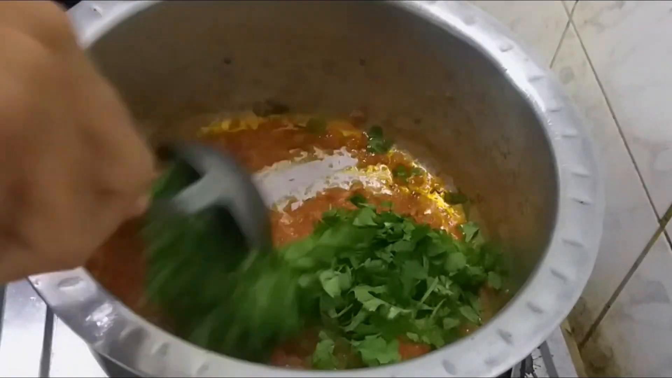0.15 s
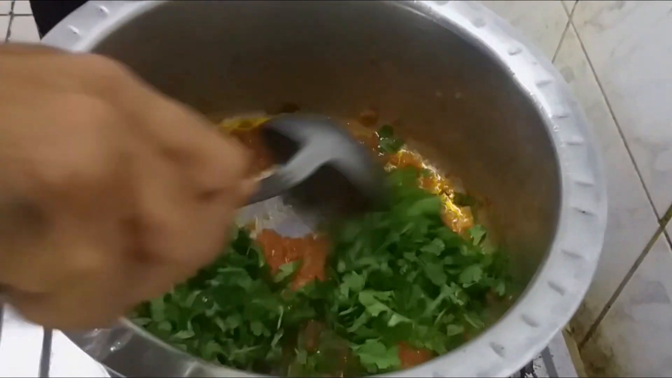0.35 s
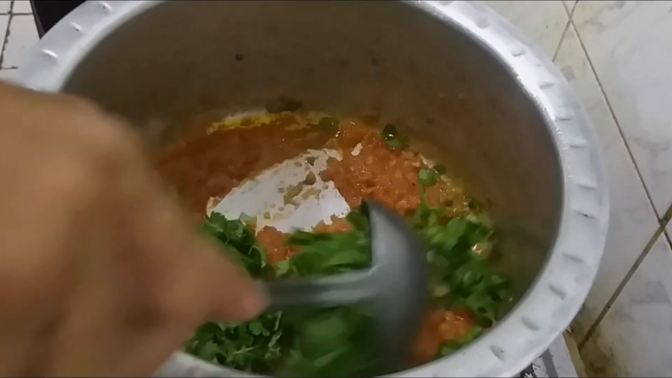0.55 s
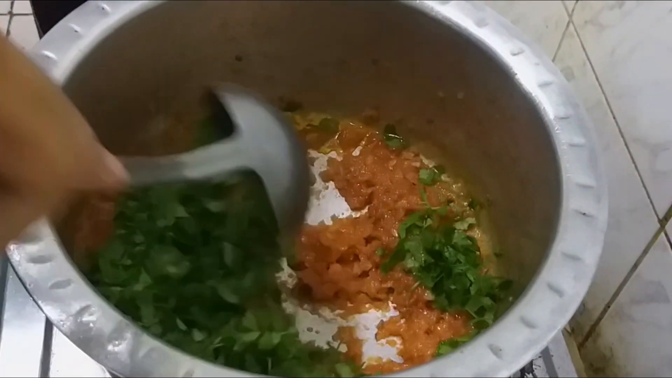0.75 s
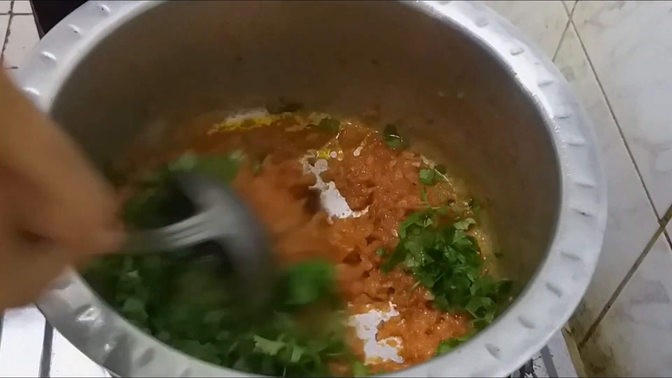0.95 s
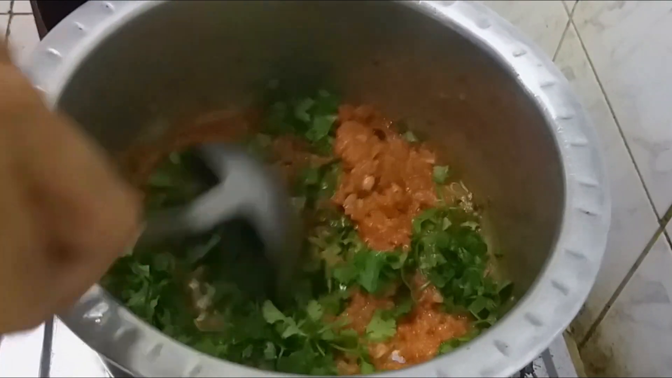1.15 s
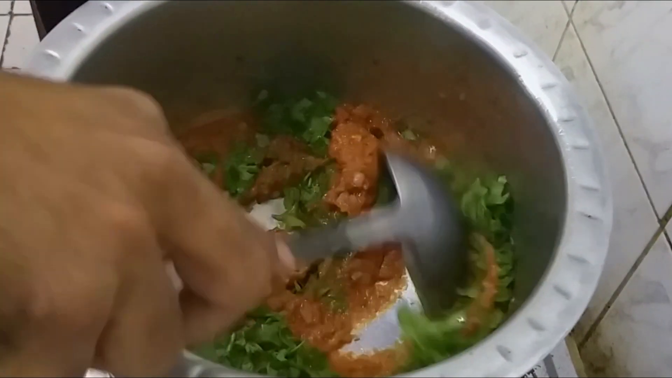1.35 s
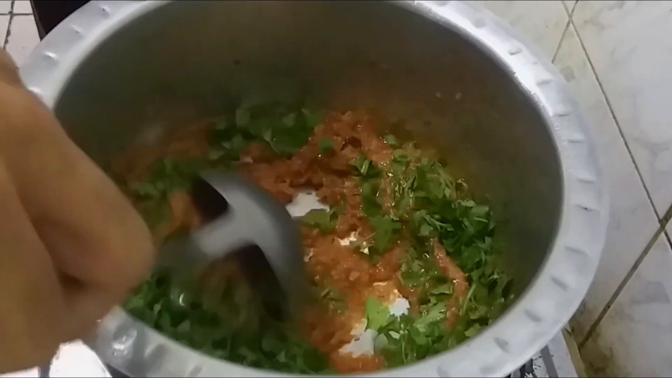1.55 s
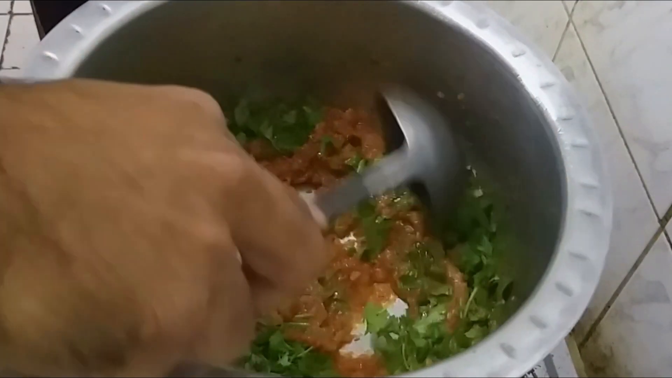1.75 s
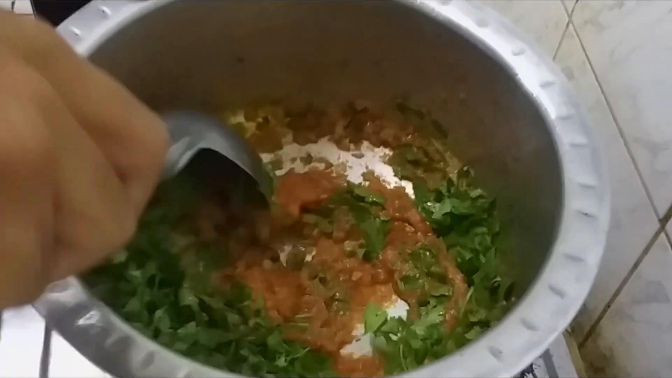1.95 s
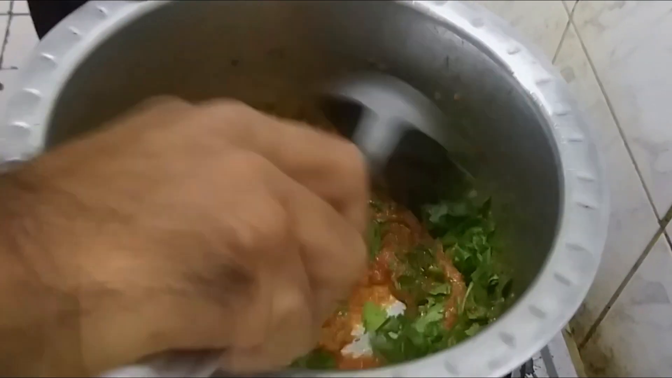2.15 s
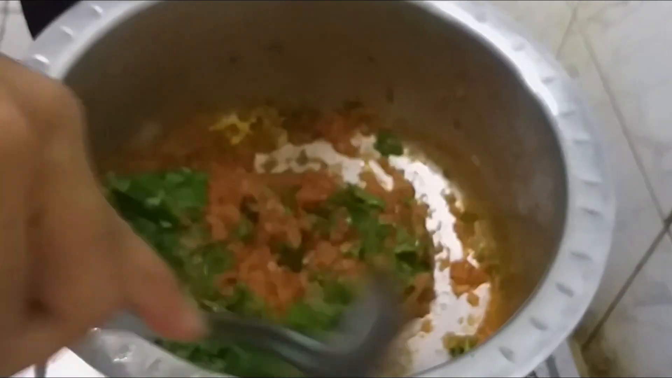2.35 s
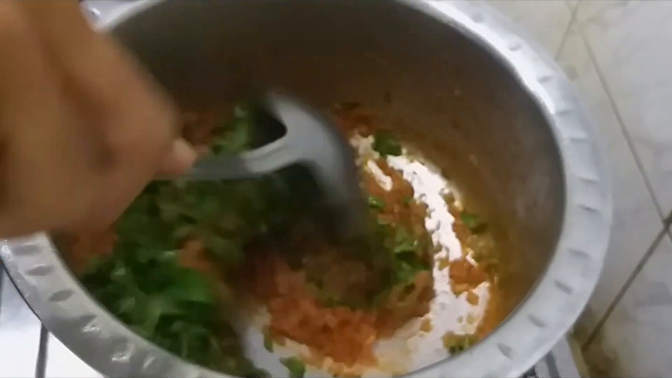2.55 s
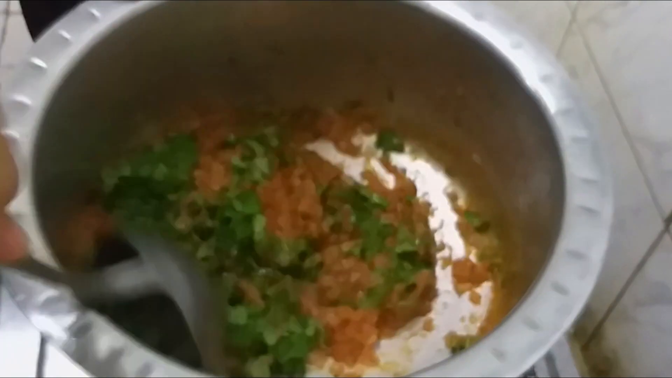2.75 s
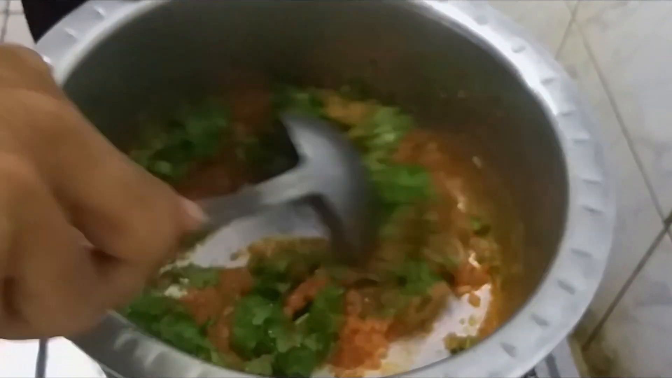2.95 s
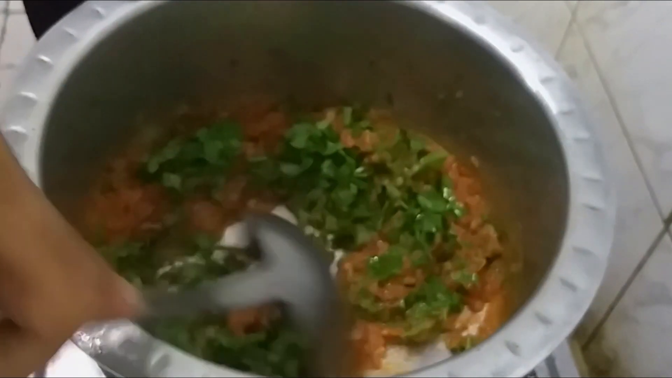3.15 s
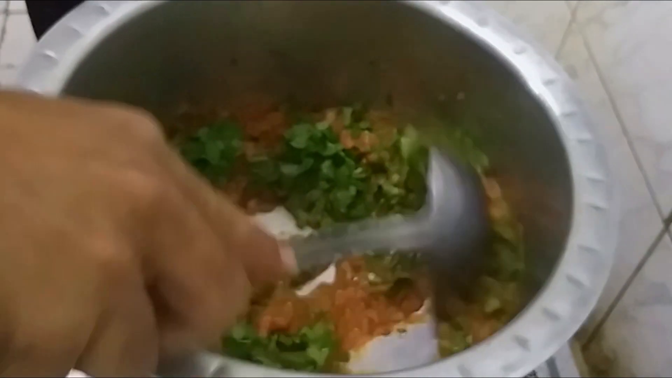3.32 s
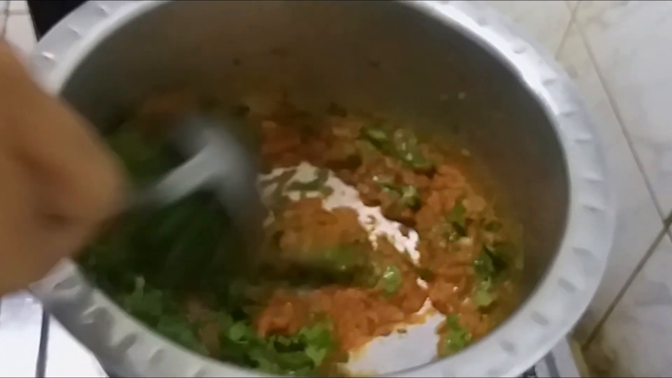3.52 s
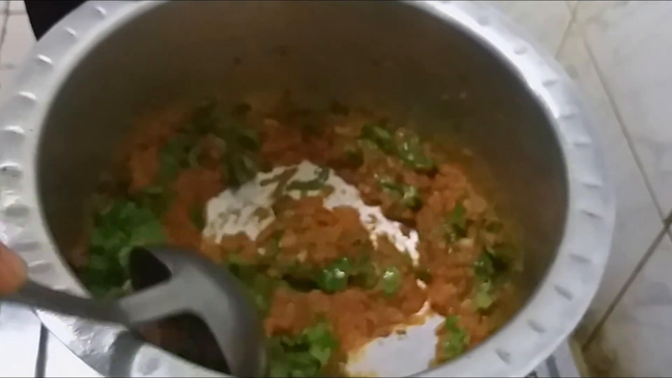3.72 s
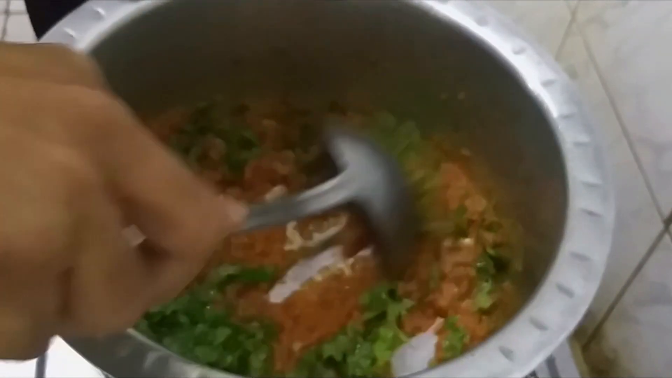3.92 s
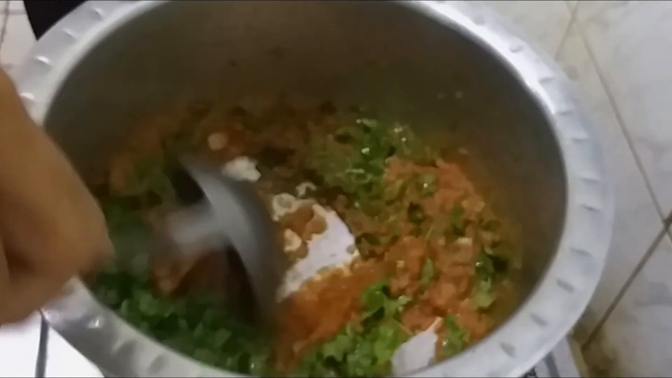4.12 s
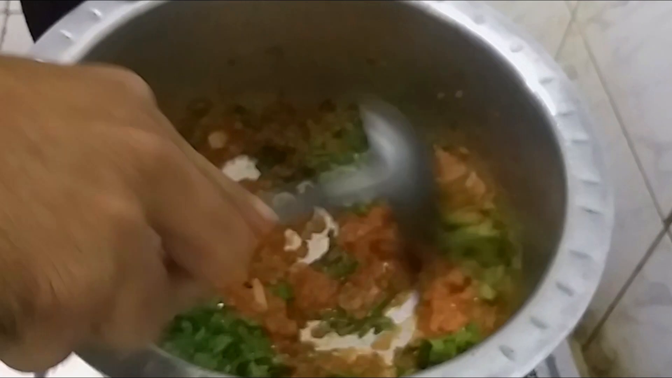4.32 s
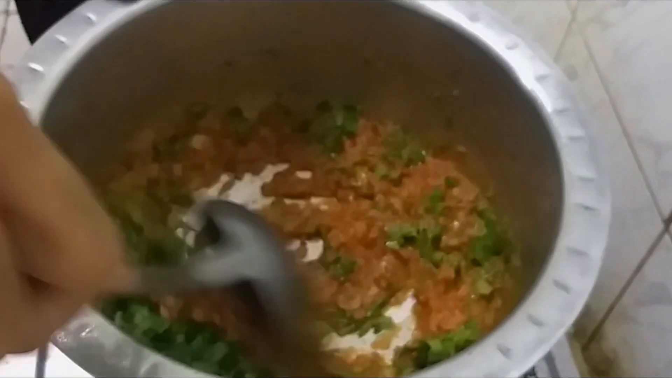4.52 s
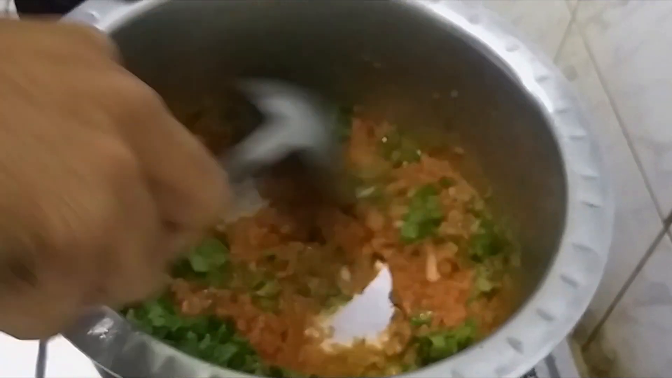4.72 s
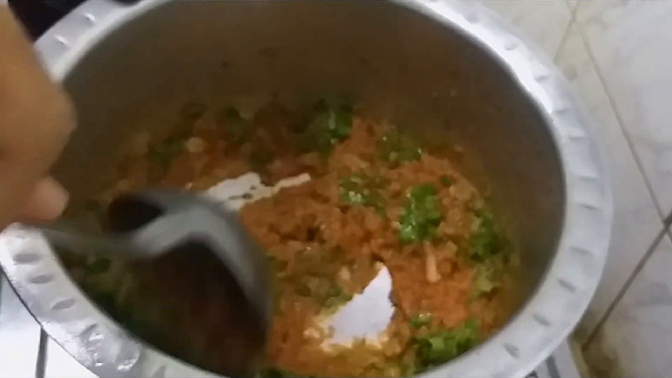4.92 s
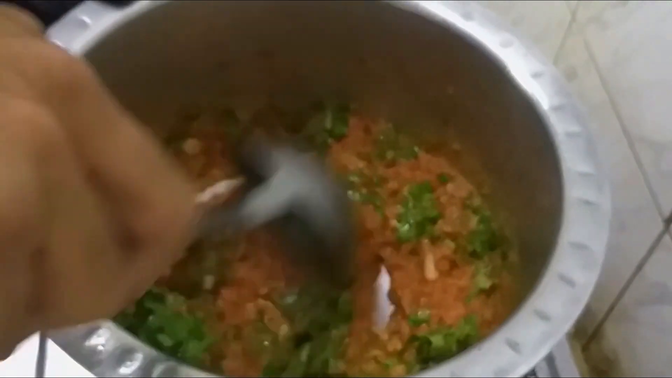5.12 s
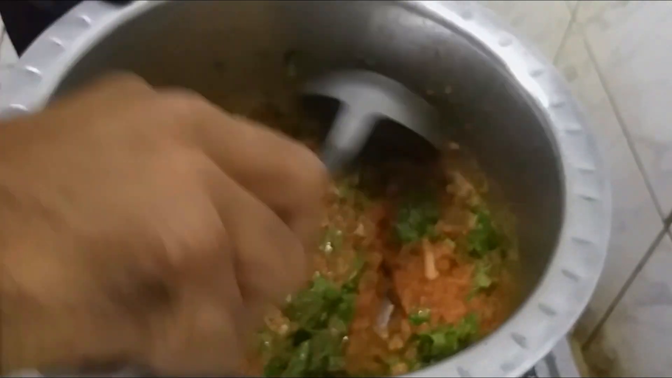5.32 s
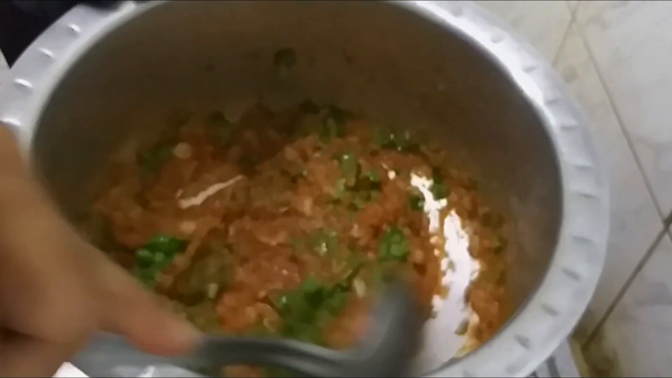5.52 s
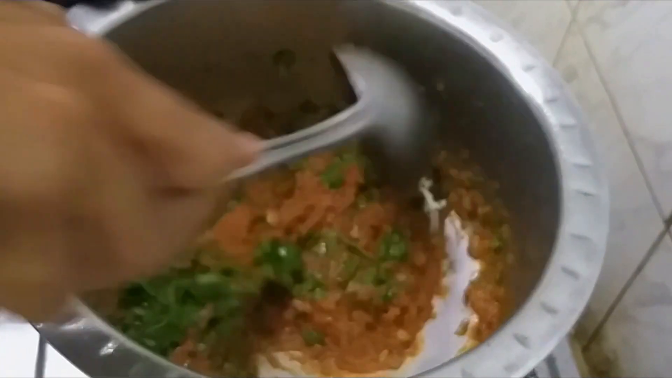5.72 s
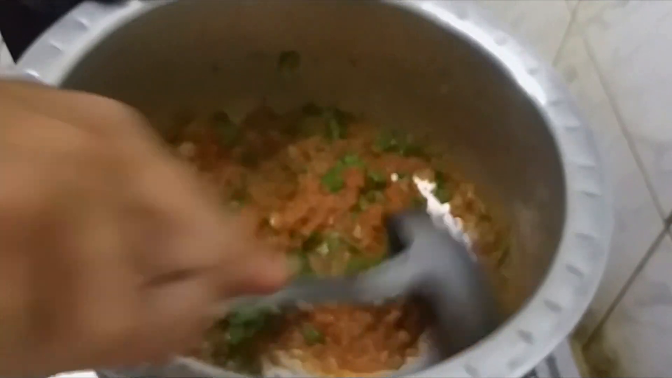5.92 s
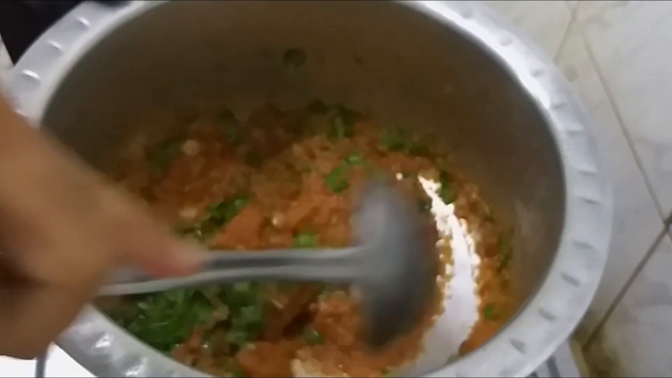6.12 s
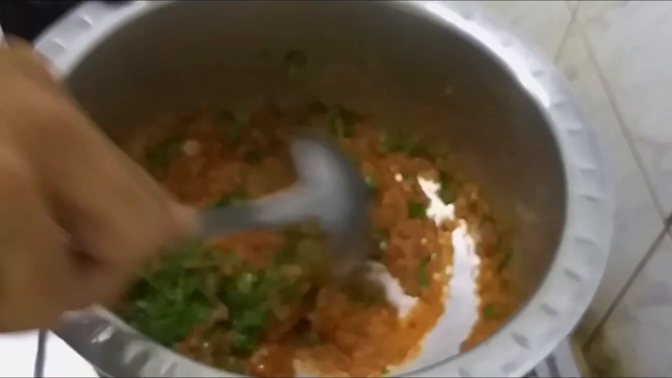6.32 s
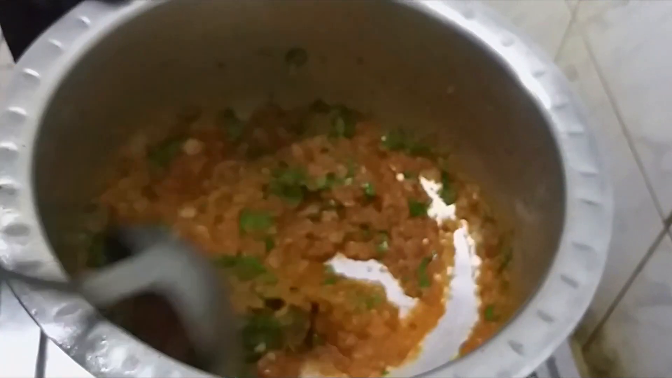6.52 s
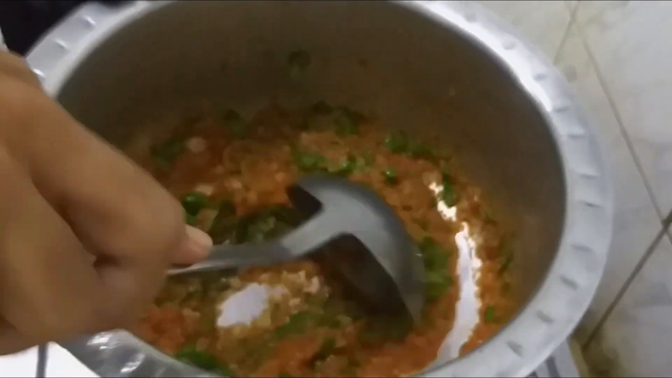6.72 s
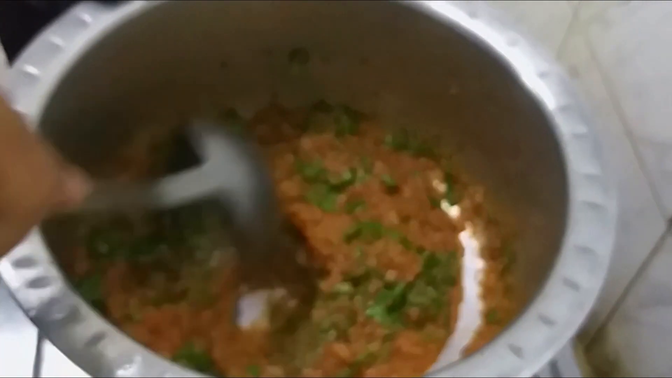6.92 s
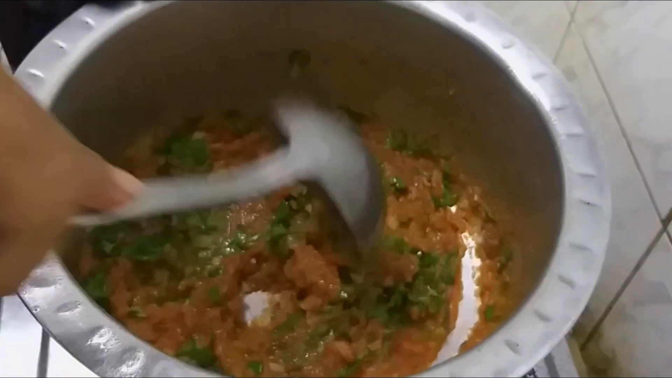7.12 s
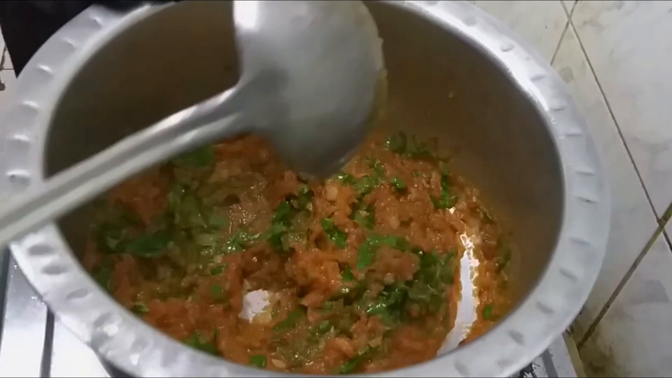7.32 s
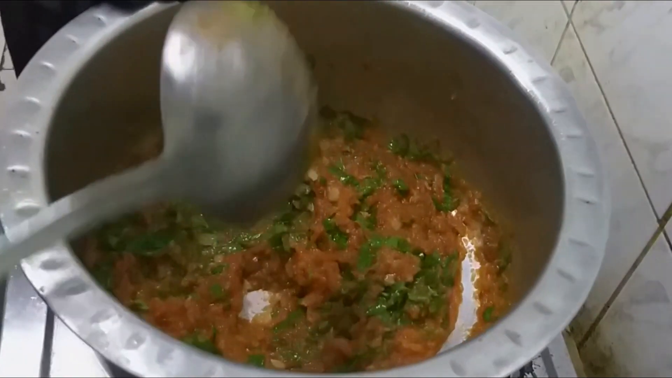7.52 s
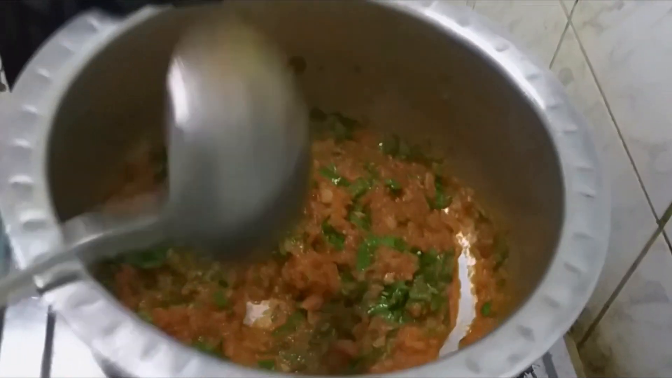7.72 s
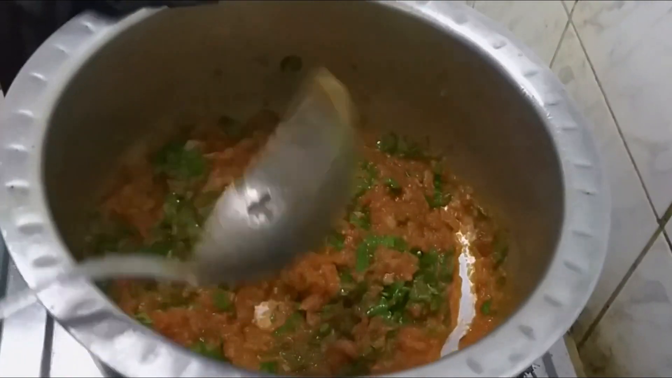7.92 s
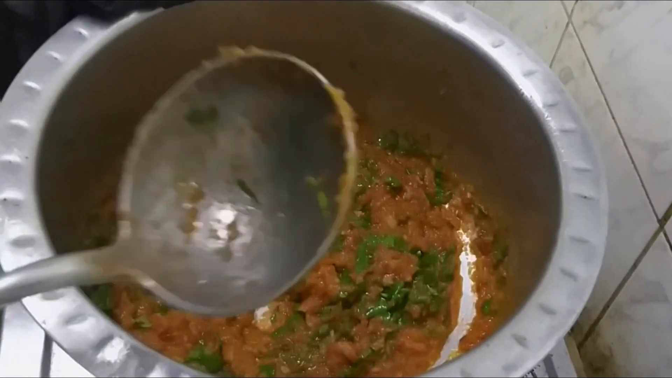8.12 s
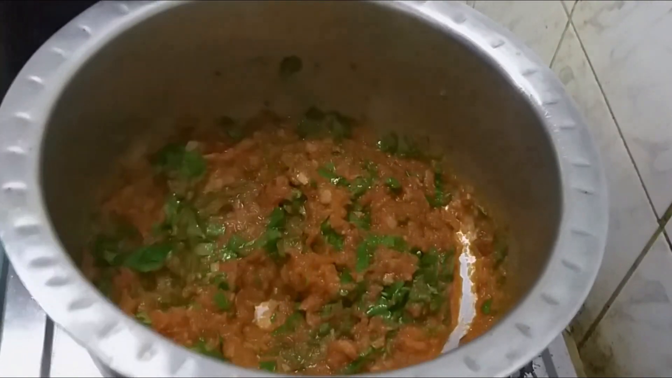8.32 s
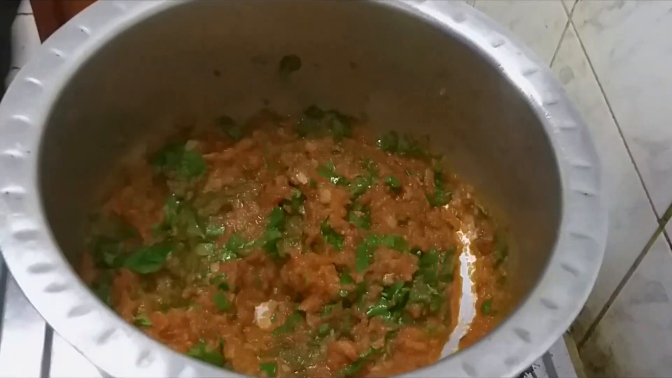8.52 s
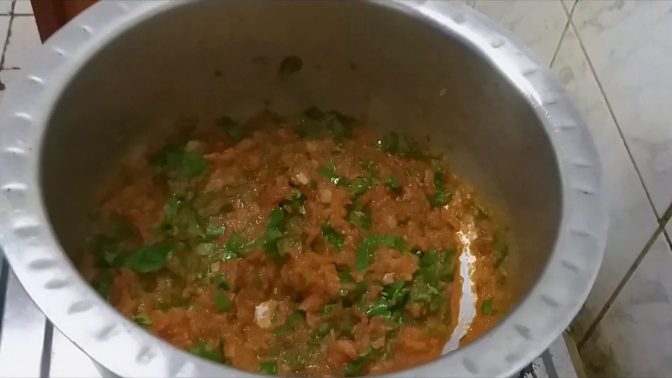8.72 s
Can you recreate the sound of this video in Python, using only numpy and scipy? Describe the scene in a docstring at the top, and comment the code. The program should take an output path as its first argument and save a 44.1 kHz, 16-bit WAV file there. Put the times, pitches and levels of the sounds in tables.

```python
"""A wet metallic scrape opens: a steel ladle stirs thick gravy and herbs in a wide aluminium pot, close by.
The edge slips and catches on the bottom, and the drag hums in the hollow pot; knocks on the damped metal
thud, and the free rim clangs in its wall modes, with two taps near the end. Bubbles fry faintly.
A far engine outside, three pure tones, revs once and is gone after the first second or so.
The tiled kitchen adds a diffuse tail; the microphone rolls off the bass and rounds the highest peaks."""
import sys
import numpy as np
from scipy import signal
from scipy.fft import rfft, irfft
from scipy.io import wavfile
from scipy.ndimage import uniform_filter1d

SR = 44100
rng = np.random.default_rng(int(sys.argv[2]) if len(sys.argv) > 2 else 0)


def dump(signal):
    """Clip the signal to [-1, 1] and save it as 16-bit WAV at the path in sys.argv[1]."""
    limited = np.clip(np.atleast_2d(signal).T, -1, 1)
    pcm = np.round(limited * 32767).astype(np.int16)
    wavfile.write(sys.argv[1], SR, pcm)


N = 385875

# Pushes of the ladle through the gravy. Each row: start in seconds, length in seconds, gritty scrape in dB and
# low rub in dB (both before their trims), swell from start to end in dB, brightness in dB per octave.
PUSHES = [ (0.0, .19, -28.5, -24, -6.5, 1), (.22, 0.3, -40, -36.5, -4, 1.5),
          (0.54, 0.068, -35, -33, 13.5, 2.5), (0.659, 0.37, -47.5, -43.5, -7, 1.5),
          (0.997, 0.076, -30.5, -33, -2, 4), (1.113, .09, -35, -33, 18, 2.5),
          (1.215, 0.036, -40.5, -31.5, -5, 6.5), (1.316, 0.14, -36, -36, -0.5, 3),
          (1.452, 0.11, -31.5, -32.5, 8, 2), (1.601, 0.089, -56, -40, 0, 4.5),
          (1.778, 0.17, -33, -33, 5.5, 0.6), (1.971, 0.17, -54, -34.5, 3, 0),
          (2.153, 0.18, -38, -31, 16.5, 3.5), (2.396, 0.022, -36.5, -40.5, 1.5, 2),
          (2.46, 0.43, -59.5, -49, -2.5, 6), (3.01, 0.12, -40, -39, 14, 1.5),
          (3.249, 0.24, -44, -47, -3.5, 1.5), (3.916, 0.19, -52, -50.5, -1, -1.5),
          (4.06, 0.076, -36, -39.5, 8.5, 0), (4.198, 0.071, -49, -32.5, 2, 1),
          (4.336, .05, -40, -37, 10.5, 2), (4.454, 0.015, -37.5, -47, 4.5, 7),
          (4.588, 0.068, -32, -32, 0, 4.5), (4.667, 0.15, -40.5, -44.5, -15.5, -0.5),
          (4.927, 0.098, -43, -46.5, 2, 1), (5.37, 0.16, -48.5, -49.5, 0.5, -2),
          (5.541, 0.094, -48, -35, -18.5, 2), (5.87, 0.093, -42.5, -33, 0, 5),
          (6.012, 0.052, -43.5, -35, -0.5, 2), (6.292, 0.38, -56, -47, -7, -1),
          (6.864, 0.088, -56, -44, -5, 1.5)]
# Bubbles, gravy and room by spectrum; each row: frequency in Hz, density in dB per Hz.
# The scrape of the edge on grit:
GRIT_SPECTRUM = [(300, -19), (700, -6), (1100, 0), (1800, 7), (2700, 0), (4000, 0.5), (6000, -2), (8500, 0),
                 (10000, -12.5), (13000, -8), (16000, -18)]
# The low rub of the dragged ladle:
RUB_SPECTRUM = [(41, -58), (70, -23), (83, -21.5), (97, -14), (211, -17), (254, -6), (332, 2.5), (371, -7),
                (439, 1), (475, -8.5), (519, 1.5), (663, -13), (856, -25), (895, -40.5), (1000, -19),
                (1300, -46.5), (2200, -120)]
# The frying:
FRYING_SPECTRUM = [(1000, -11.5), (3000, -11), (6000, -7.5), (8300, 0), (10000, -12.5), (16000, -23.5)]
# The quiet room:
ROOM_SPECTRUM = [(25, -15), (60, -15), (110, 12), (180, -1), (300, 2), (500, 0.5), (800, -17.5),
                 (1500, -32), (3000, -39), (16000, -43.5)]
# The click of metal touching metal:
CLICK_SPECTRUM = [(100, -18.5), (400, -7.5), (900, -13.5), (1650, 5), (2400, 1), (4000, 2.5), (6000, -2.5),
                  (8500, -2), (10000, -17), (13000, -10), (16000, -24.5)]
# How unevenly the scrape is coloured. Each row: frequency in Hz, spread in dB.
SCRAPE_PATCHINESS = [(1000, 3.2), (3000, 3.2), (7000, 2.4), (14000, 2.2)]
# The air in the pot and its loaded bottom. Each row: mode in Hz, level in dB,
# ring time t60 in seconds before the blow's own factor.
HOLLOW_MODES = [(162, -10.5, 0.36), (280, -22, 0.45), (301.6, -18, 0.085), (333.8, -3.5, 0.32),
                (414, -13.5, 0.078), (445.4, 1.5, 0.21), (516, 6.5, .16), (560, -5.5, 0.042),
                (635, -14.5, .1), (795, -16, .08), (1094, -11.5, .1)]
# The far engine outside. Each row: time in seconds, firing rate in Hz before its wander, level in dB.
ENGINE_COURSE = [(0, 109.5, -31), (.1, 106, -50), (.25, 99, -41), (.86, 100, -45.5), (.97, 149.5, -39.5),
                 (1.05, 162, -45), (1.2, 149, -67)]
# The tiled kitchen's decay. Each row: frequency in Hz, t60 in seconds.
KITCHEN_DECAY = [(100, 0.5), (400, 0.84), (1000, 0.95), (3000, 0.83), (5000, 0.8), (8000, 0.54),
                 (15000, 0.51)]
# The edge catches hard, or a wet pocket snaps. Each row: start in seconds, level in dB before a trim, centre in Hz.
HARD_SNAPS = [(.141, -20, 8300), (.559, -32, 7960), (.711, -30, 1460), (1.317, -34.5, 3520),
              (1.943, -25, 4700), (2.051, -32.5, 8700), (2.101, -28, 4536), (3.449, -38.5, 2360),
              (4.069, -33, 1720), (4.47, -30.5, 6920), (4.826, -38, 6010), (6.011, -31.5, 2830)]
# The ladle meets the gravy-damped bottom or wall. Each row: start in seconds, thud in dB, thud centre in Hz,
# contact click in dB before a trim.
DAMPED_KNOCKS = [(0.264, -27.5, 345, -48), (.994, -24.5, 363, -26.5), (1.185, -22.5, 400, -33),
                 (1.539, -34, 470, -29), (1.778, -28, 430, -35), (1.978, -26, 320, -42),
                 (2.154, -10, 463, -10), (2.335, -25, 327, -28), (3.09, -45, 275, -31),
                 (3.257, -37, 318, -54), (3.605, -31.5, 338, -49), (4.186, -24.5, 388, -37.5),
                 (4.556, -23, 383, -40), (4.878, -33, 310, -48), (5.285, -24, 1030, -22.5),
                 (5.546, -29, 311, -36.5), (5.835, -12, 557, -15), (6.012, -26, 400, -37),
                 (6.261, -22, 390, -26.5), (6.418, -30.5, 450, -47), (6.865, -29.5, 405, -36.5),
                 (7.392, -46.5, 516, -72), (8.378, -43.5, 516, -60), (8.635, -49.5, 510, -68)]
# Metal on the free rim. Each row: start in seconds, ring level in dB, ring time t60 in seconds before each mode's
# factor, place from 0 (near rim) to 1 (far rim), contact click in dB re the ring, thud in dB.
RIM_BLOWS = [(2.773, -11.5, 0.26, 0.1, -3.5, -22), (3.807, -27, 0.19, 0.06, 0, -46),
             (5.045, -12, 0.15, 0.12, -0.5, -23.5), (5.285, -27.5, 0.05, 0.19, -19, -37),
             (5.796, -40, 0.075, 0.71, -4.5, -44), (6.578, -10.5, 0.21, 0, 2, -18.5),
             (7.587, -12, 0.13, 1, 6.5, -18), (7.767, -10.5, 0.067, 0.96, 2, -23)]
# The pot's wall. Each row: mode in Hz, dB struck at the near rim, dB struck at the far rim, factor on the ring time.
WALL_MODES = [(1138, -8.5, -15.5, 1.8), (1170, -13.5, -5.5, 2.3), (1386, -9, -16, 1.1), (1510, -9, -26, .8),
              (1602, 0, -5.5, 1.5), (1850, -33, -9.5, 1), (2000, -25, -14.5, 1), (2420, -3.5, -26.5, 0.83),
              (2490, -12.5, -28, 1.6), (2545, -11, -17.5, 1.6), (2805, -25.5, -2.5, 3.5),
              (2980, 3, -5.5, 1.1), (3140, 1.5, -2.5, 1), (3113, -5, -17, 2.4), (3250, -5.5, -1.5, 1.7),
              (4000, -15.5, -6.5, 1), (4400, -16.5, -19, 1), (4570, -10.5, -15.5, 2.2),
              (4640, -8.5, -9, 0.6), (4590, -4.5, -17.5, 0.62), (4640, -14.5, -2.5, .8),
              (4883, -16.5, 8, .8), (5594, -24, -7.5, 1), (5650, -27, -11, 1), (6330, 0.5, -13.5, 0.92),
              (6570, -2.5, -12, 1.9), (6970, -21, 0, .8), (7800, -21, -1.5, 0.56), (8020, -12.5, -3, 0.46),
              (9350, -15, -7, 0.63)]
# The wall's countless small modes. Each row: frequency in Hz, dB per Hz struck at the near rim, at the far rim.
WALL_SHIMMER = [(400, -12, -19.5), (915, -11.5, -4), (1140, -6.5, -5.5), (1600, -6.5, -7), (2290, -8, -5.5),
                (3200, 4, 1), (3680, -4.5, -10), (4870, 6, 5.5), (5370, -6, 0), (6850, -7.5, -2),
                (8770, -5.5, -2), (9800, -18, -18.5), (12500, -15, -10.5), (15920, -27.5, -22.5)]
# Balance at the microphone. Each row: frequency in Hz, left minus right in dB.
LEFT_LEAN = [(500, 0), (800, 0), (1170, .5), (1600, 1.8), (2740, 0), (15000, 0)]

TIME = np.arange(N) / SR
RING = TIME[:SR * 7 // 10]  # the 0.7 s span given to any one hit
LOW_CUT_HZ, BAND_EDGE_HZ = 86, 15750  # the microphone's bass roll-off, and the upper band limit
GRIP_S, LET_GO_S = 0.009, 0.013  # the edge bites quickly, and slides out of the pulp
SETTLE_DB, SETTLE_S = -18, 0.073  # the pushed gravy slumps back with a faint rustle
SNAP_CYCLES = 230  # a snap falls 60 dB in this many cycles, so low ones last longer
KNOCK_LASTING = .84  # gravy shortens the hollow's ring by this factor
RIM_THUD_HZ, RIM_THUD_LAG_S, RIM_THUD_LASTING = 400, .012, 1.45  # a blow on the rim also wakes the hollow
ROCK_HZ, ROCK_DB, ROCK_LAG_S = 159, -13.5, 0.0083  # a far tap rocks the pot on the stove (dB re thud)


def gain_of(db):
    """Amplitude factor of a level in dB."""
    return 10 ** (np.asarray(db) / 20)


def evened(x):
    """Scales a sound to rms 1."""
    return x / np.sqrt(np.mean(x ** 2) + 1e-20)


def peaked(x, size=180):
    """Scales a hit so that its loudest few milliseconds have rms 1."""
    return x / np.sqrt(uniform_filter1d(x ** 2, size).max() + 1e-20)


def read(points, hz):
    """Reads a table at any frequency, straight between its points on a log axis."""
    f, value = np.transpose(points)
    return np.interp(np.log(hz + 1), np.log(f + 1), value)


def add(mix, s, sound):
    """Lays a sound into the mix at s seconds."""
    part = mix[max(round(s * SR), 0):][:len(sound)]
    part += sound[:len(part)]


def dying(t60):
    """Exponential decay that falls 60 dB in t60 seconds."""
    return np.exp(-np.log(1000) * RING / np.maximum(t60, 1e-3))


def coloured(x, points, size=4096):
    """Causal minimum-phase filter with the given spectrum."""
    log_gain = np.log(gain_of(read(points, abs(np.fft.fftfreq(size, 1 / SR)))))
    taps = np.fft.ifft(np.exp(np.conj(signal.hilbert(log_gain)))).real[:size // 2]
    return signal.oaconvolve(x, taps)[:len(x)]


def wandering(size):
    """Slow random drift of rms 1, smoothed over size samples."""
    return evened(uniform_filter1d(rng.standard_normal(N), size=size))


def patches(shape, bands, frames):
    """Random blotches of rms 1 over pitch and time, smoothed over so many bands and frames."""
    over_pitch = uniform_filter1d(rng.standard_normal(shape), size=bands, axis=0)
    return evened(uniform_filter1d(over_pitch, size=frames, axis=1))


def crackle(per_s, spread_db):
    """A random train of tiny clicks, a few of them much larger than the rest."""
    size = gain_of(spread_db * np.minimum(rng.exponential(1, N), 4))
    return size * rng.choice([-1, 1], N) * (rng.random(N) < per_s / SR)


def burst(t60, points):
    """A crowd of close modes that die together, made of decaying coloured noise."""
    return peaked(coloured(rng.standard_normal(len(RING)) * dying(t60), points))


def pressure(length, swell_db):
    """One push: the edge bites, presses harder or eases off, and lets go; the pulp settles behind it."""
    t = TIME[:SR]
    held = gain_of(swell_db * (np.minimum(t / length, 1) - .5))
    after = np.maximum(t - length, 0)
    release = np.maximum(np.exp(-after / LET_GO_S), gain_of(SETTLE_DB) * np.exp(-after / SETTLE_S))
    return np.minimum(t / GRIP_S, 1) * held * release


def stirring(jerky_db=1.5, jerk_s=.014):
    """All pushes over time: strength of scrape and rub, and the brightness of the push that leads."""
    grit, low, tilt = np.zeros((3, N))
    for s, length, grit_db, rub_db, swell_db, brightness in PUSHES:
        push = pressure(length, swell_db)
        add(grit, s, gain_of(grit_db) * push)
        add(low, s, gain_of(rub_db) * push)
        add(tilt, s, brightness * gain_of(grit_db) * push)
    jerks = wandering(round(jerk_s * SR))  # the edge sticks and slips on lumps
    return grit * gain_of(jerky_db * jerks), low, tilt / (grit + 1e-9)


def scrape(brightness, level_db=-1, slips_per_s=9000, spread_db=4.0,
           rasps_per_s=45, rasp_spread_db=5.0, rasp_db=-2, cycles=14):
    """The edge slips finely over wet pulp and catches on grit, each catch ringing briefly at its own pitch."""
    rasps = np.zeros(N)
    t = TIME[:1500]
    for hz in np.geomspace(900, 9000, num=28):
        age = t * hz / cycles
        bend = 1 + rng.uniform(-1.2, 1) * t  # each pitch glides slightly
        grain = age * np.exp(-2 * age) * np.sin(2 * np.pi * hz * t * bend)
        catches = crackle(rasps_per_s * np.sqrt(hz / 2000), rasp_spread_db)  # the rate holds at 2 kHz
        rasps += signal.oaconvolve(catches, grain * hz ** (3 / 4))[:N]
    slips = evened(coloured(crackle(slips_per_s, spread_db), GRIT_SPECTRUM))
    slips = slips + gain_of(rasp_db) * evened(coloured(rasps, GRIT_SPECTRUM))
    hz, t, z = signal.stft(slips, SR, nperseg=256)
    # the ladle's resonances shift as the contact point moves
    patchy_db = read(SCRAPE_PATCHINESS, hz)[:, None] * patches(z.shape, bands=8, frames=6)
    octaves = np.log2(np.clip(hz, 1000, 8000) / 4000)[:, None]
    tilt_db = octaves * np.interp(t, TIME, brightness)
    slips = signal.istft(z * gain_of(tilt_db + patchy_db), SR, nperseg=256)[1][:N]
    return evened(slips) * gain_of(level_db)


def rub(level_db=-2, judders_per_s=500, spread_db=3, hollow_share=0.41, lumpy_db=3):
    """The dragged ladle judders on the bottom and sounds the hollow pot; lumps of gravy shift the tone."""
    judder = crackle(judders_per_s, spread_db)
    hollow = sum(gain_of(db) * dying(t60) * np.cos(2 * np.pi * hz * RING) for hz, db, t60 in HOLLOW_MODES)
    ringing = evened(signal.oaconvolve(judder, hollow)[:N])
    dragged = evened(coloured(judder, RUB_SPECTRUM)) + hollow_share * ringing
    z = signal.stft(dragged, SR, nperseg=1024)[2]
    lumps = patches(z.shape, bands=3, frames=4)
    lumpy = signal.istft(z * gain_of(lumpy_db * lumps), SR, nperseg=1024)[1][:N]
    return evened(lumpy) * gain_of(level_db)


def frying(pops_db=-66, fizz_db=-64, pops_per_s=4, spread_db=5, cycles=6):
    """Tiny bubbles burst, each size with its own pitch, over a fine fizz; levels are before the colouring."""
    pops = np.zeros(N)
    t = TIME[:400]
    for hz in np.geomspace(4000, 14000, num=12):
        pop = np.sin(2 * np.pi * hz * t) * np.exp(-2 * hz * t / cycles)
        pops += signal.oaconvolve(crackle(pops_per_s, spread_db), pop)[:N]
    fizz = rng.standard_normal(N)
    return coloured(gain_of(pops_db) * evened(pops) + gain_of(fizz_db) * fizz, FRYING_SPECTRUM)


def engine(one_and_half_db=-7, double_db=-8):
    """Only the lowest orders of a far engine come through the wall: 1, 1.5 and 2 times its firing rate."""
    s, hz, db = np.transpose(ENGINE_COURSE)
    rate = np.interp(TIME, s, hz) * (1 + 0.013 * wandering(1500))
    phase = 2 * np.pi * np.cumsum(rate) / SR
    orders = np.sin(phase)
    orders += gain_of(one_and_half_db) * np.sin(1.5 * phase)
    orders += gain_of(double_db) * np.sin(2 * phase)
    return orders * gain_of(np.interp(TIME, s, db, right=-120))


def background(air_db=-58, hum_hz=113, hum_db=-63):
    """Low room noise, shaped from white noise, and a hum whose pitch wavers."""
    hum = evened(np.sin(2 * np.pi * np.cumsum(hum_hz * (1 + 0.0092 * wandering(6000))) / SR))
    air = evened(coloured(rng.standard_normal(N), ROOM_SPECTRUM))
    return gain_of(air_db) * air + gain_of(hum_db) * hum


def kitchen(x, wet_db=-8, build_s=0.013):
    """Hard tiles give a long diffuse tail, each band dying at its own speed."""
    hz, t, z = signal.stft(rng.standard_normal(SR), SR, nperseg=256)
    decay_db = -60 * t / read(KITCHEN_DECAY, hz)[:, None]
    tail = signal.istft(z * gain_of(decay_db), SR, nperseg=256)[1][:SR]
    tail = tail * (1 - np.exp(-(TIME[:SR] / build_s) ** 2))
    return x + gain_of(wet_db) * signal.fftconvolve(x, tail / np.linalg.norm(tail))[:N]


def snap(hz):
    """A short tick of decaying noise around one pitch."""
    return burst(SNAP_CYCLES / hz, [(hz / 8, -26), (hz / 2, -7), (hz, 0), (hz * 2, -7), (hz * 4, -22)])


def snaps(level_db=-2, small_db=-2, low_hz=2200, high_hz=8000):
    """The hard catches, and a small one somewhere in every push, about as strong as its scrape."""
    out = np.zeros(N)
    for s, db, hz in HARD_SNAPS:
        add(out, s, gain_of(db + level_db) * snap(hz))
    for s, length, grit_db, *_ in PUSHES:
        when, pitch = rng.random(2)
        small = snap(low_hz * (high_hz / low_hz) ** pitch)
        add(out, s + when * length, gain_of(grit_db + small_db) * small)
    return out


def thud(centre_hz, lasting, focus_db=6, push_db=-1, push_t60=0.081, detune=.025, uneven_db=2):
    """A dull thud: the hollow's modes nearest the centre ring over a soft push of low noise."""
    hz, mode_db, t60 = np.transpose(HOLLOW_MODES)[:, :, None]
    shift, spot = rng.standard_normal((2, *hz.shape))  # ladle and gravy load the pot differently each time
    weight = gain_of(mode_db + uneven_db * spot - focus_db * np.log2(hz / centre_hz) ** 2)
    turns = hz * (1 + detune * shift) * RING + 0.29 * rng.random(hz.shape)
    modes = (weight * dying(t60 * lasting) * np.sin(2 * np.pi * turns)).sum(0)
    push = burst(push_t60 * lasting, [(50, -45), (centre_hz * 0.39, -19), (centre_hz * 0.72, 0),
                                      (centre_hz * 1.15, 0), (centre_hz * 1.96, -17), (4000, -50)])
    soft_start = 1 - np.exp(-RING * centre_hz * 2)
    return peaked(soft_start * (peaked(modes) + gain_of(push_db) * push))


def knocks(click_t60=0.024, click_db=.5):
    """The ladle lands on the damped pot: a thud, and a click where metal touches."""
    out = np.zeros(N)
    for s, thud_db, centre_hz, contact_db in DAMPED_KNOCKS:
        add(out, s, gain_of(thud_db) * thud(centre_hz, KNOCK_LASTING))
        add(out, s, gain_of(contact_db + click_db) * burst(click_t60, CLICK_SPECTRUM))
    return out


def clangs(light_touch=0.17, shimmer_db=1, uneven_db=1, click_t60=0.011, chatter=0.0097, rise_s=0.0003):
    """The rim rings with the wall's modes; the ladle chatters against it, roughening the ring."""
    out = np.zeros(N)
    hz, near_db, far_db, lasting = np.transpose(WALL_MODES)[:, :, None]
    hardest_db = max(row[1] for row in RIM_BLOWS)
    for s, db, t60, place, click_db, _ in RIM_BLOWS:
        far = np.clip(place, 0, 1)
        colour = [(f, at_near + far * (at_far - at_near)) for f, at_near, at_far in WALL_SHIMMER]
        # a light touch wakes the low modes less
        thin_db = light_touch * (db - hardest_db) * np.maximum(np.log2(hz.mean() / hz), 0)
        place_db = near_db + far * (far_db - near_db)
        weight = gain_of(place_db + thin_db + uneven_db * rng.standard_normal(hz.shape))
        # each touch of the ladle jolts the phases, most of all in the high modes
        touches = np.cumsum(rng.standard_normal((len(hz), len(RING))), axis=1)
        jolts = chatter * np.sqrt(hz / hz.mean()) * touches
        turns = hz * RING + rng.random(hz.shape) + jolts
        modes = (weight * dying(t60 * lasting) * np.sin(2 * np.pi * turns)).sum(0)
        ring = peaked(peaked(modes) + gain_of(shimmer_db) * burst(t60, colour))
        click = gain_of(click_db) * burst(click_t60, colour)
        add(out, s, gain_of(db) * (ring + click) * (1 - np.exp(-RING / rise_s)))
    return out


def rim_thuds(rattle_db=-4, rattle_t60=0.01):
    """Rattle and hollow follow a near-rim blow late; on the far rim they sound at once and the pot rocks."""
    out = np.zeros(N)
    for s, _, _, place, _, thud_db in RIM_BLOWS:
        far = np.clip(place, 0, 1)
        rattle = gain_of(rattle_db) * burst(rattle_t60, CLICK_SPECTRUM)
        body = thud(RIM_THUD_HZ, RIM_THUD_LASTING) + rattle
        add(out, s + RIM_THUD_LAG_S * (1 - far), gain_of(thud_db) * body)
        rock = thud(ROCK_HZ, RIM_THUD_LASTING)
        add(out, s + ROCK_LAG_S, far * gain_of(thud_db + ROCK_DB) * rock)
    return out


def scene():
    """The pot in its kitchen, almost in mono, with a slight lean to the left around 1.6 kHz."""
    grit, low, brightness = stirring()
    pot = grit * scrape(brightness) + low * rub() + frying()
    pot += snaps() + knocks() + clangs() + rim_thuds()
    sound = kitchen(pot) + engine() + background()
    lean_db = read(LEFT_LEAN, np.fft.rfftfreq(N, 1 / SR)) / 2
    return irfft(rfft(sound) * gain_of([lean_db, -lean_db]), N)


def record(dry):
    """The microphone drops the deep bass and rounds off peaks near full scale; then the band limit."""
    thin = signal.sosfilt(signal.butter(2, LOW_CUT_HZ, "high", fs=SR, output="sos"), dry)
    held = thin / (1 + thin ** 8) ** (1 / 8)
    band = signal.firwin(255, BAND_EDGE_HZ, window=("kaiser", 8), fs=SR)
    return signal.oaconvolve(held, band[None], "same")


dry = scene()
out = record(dry)
dump(out)
```